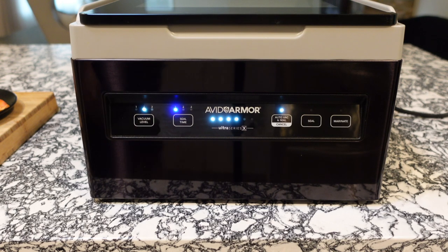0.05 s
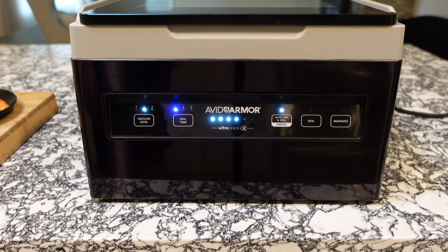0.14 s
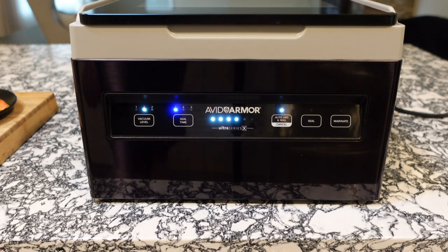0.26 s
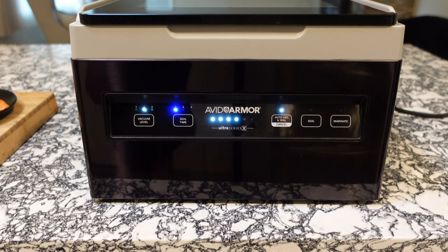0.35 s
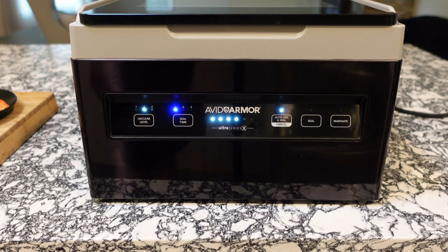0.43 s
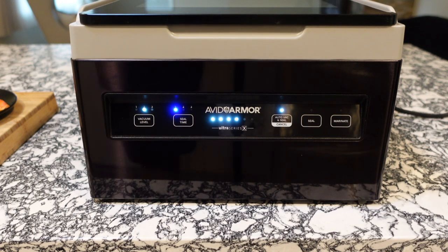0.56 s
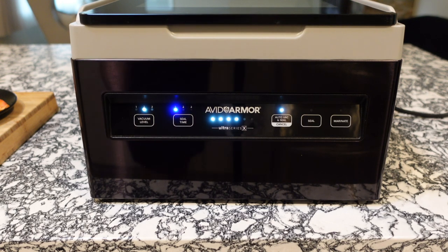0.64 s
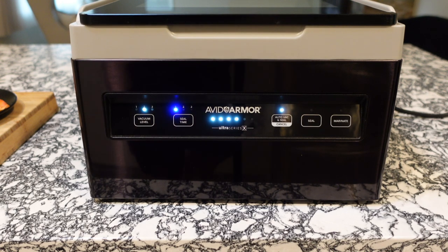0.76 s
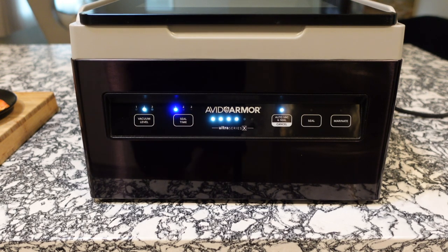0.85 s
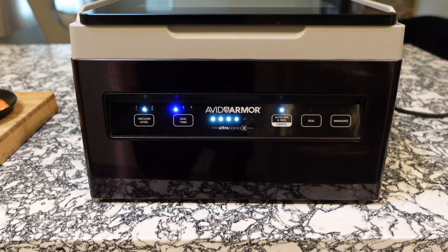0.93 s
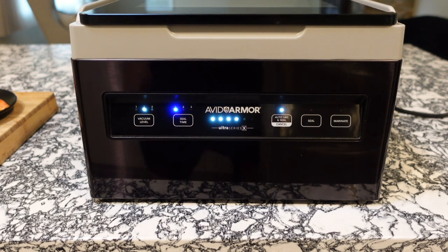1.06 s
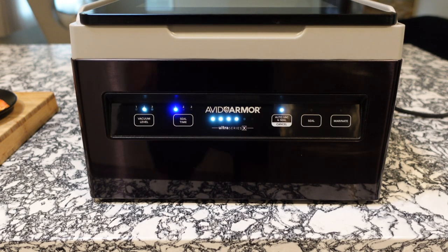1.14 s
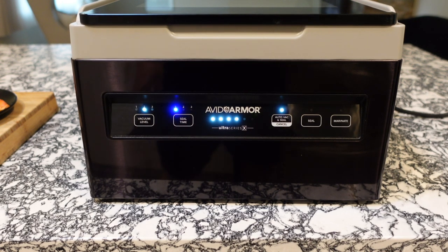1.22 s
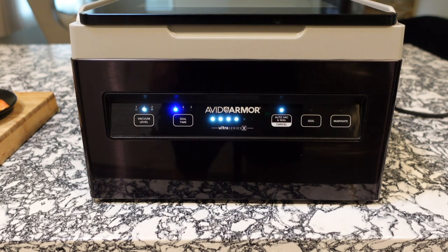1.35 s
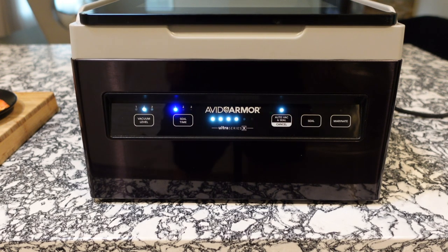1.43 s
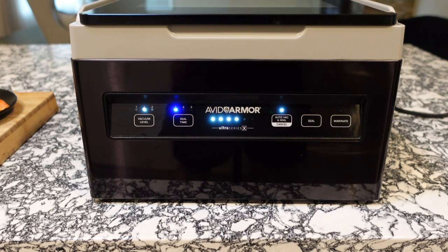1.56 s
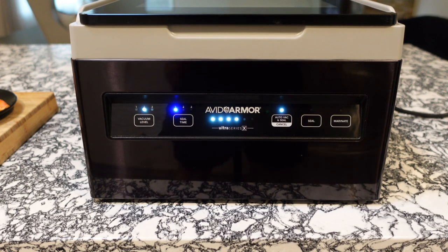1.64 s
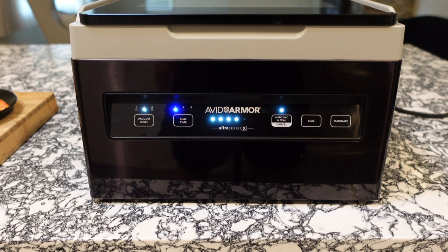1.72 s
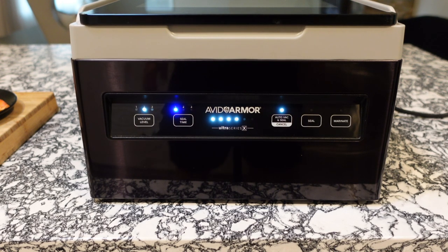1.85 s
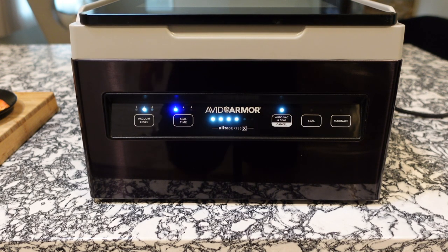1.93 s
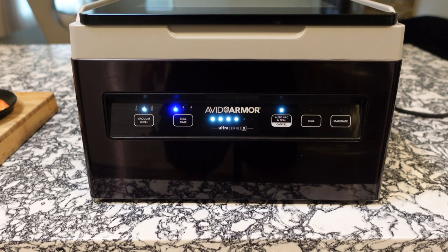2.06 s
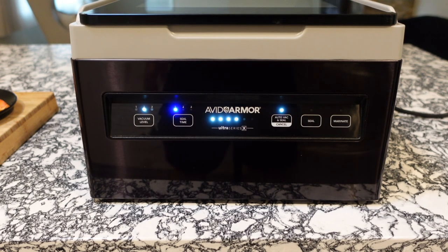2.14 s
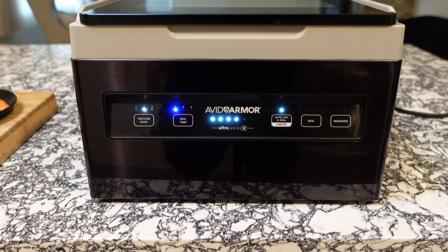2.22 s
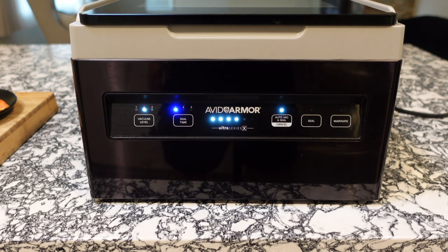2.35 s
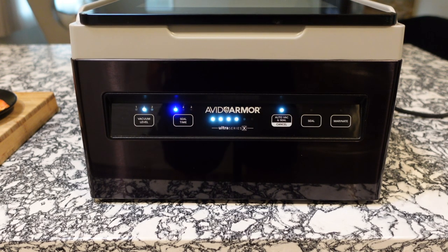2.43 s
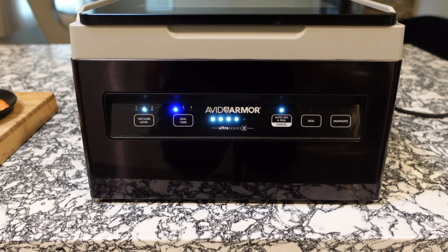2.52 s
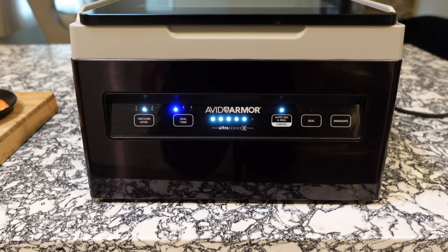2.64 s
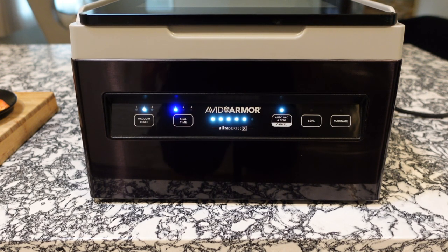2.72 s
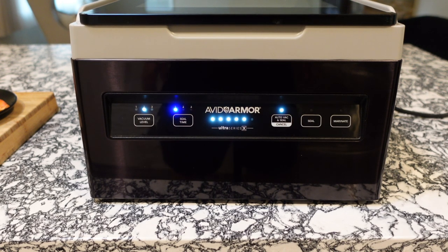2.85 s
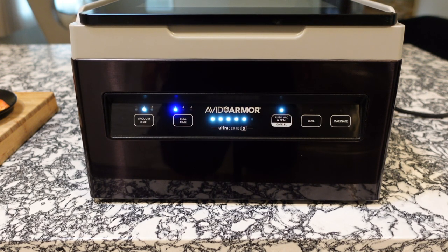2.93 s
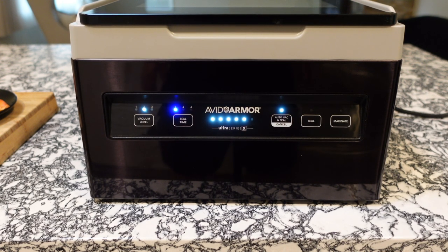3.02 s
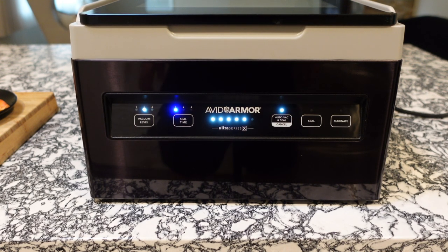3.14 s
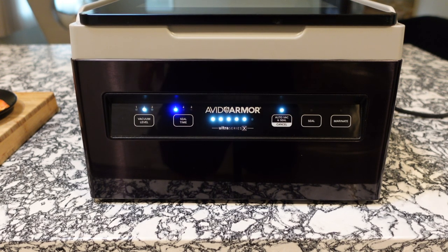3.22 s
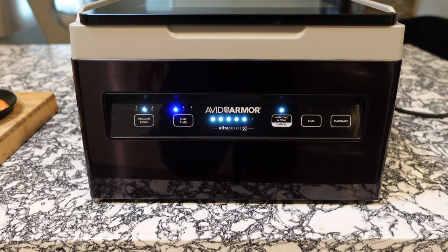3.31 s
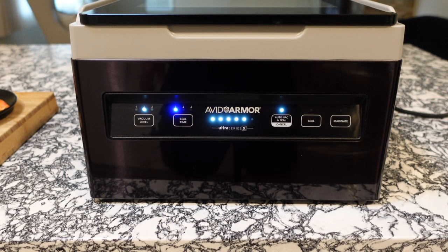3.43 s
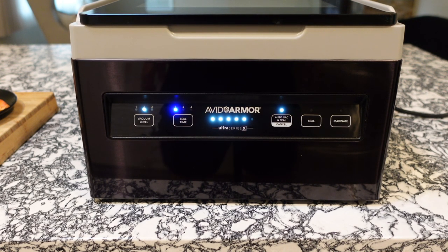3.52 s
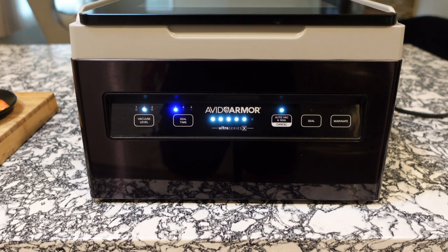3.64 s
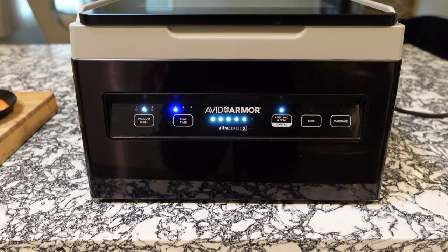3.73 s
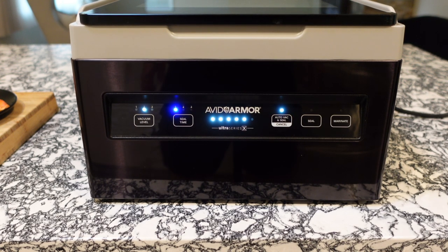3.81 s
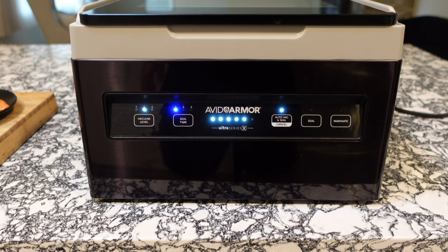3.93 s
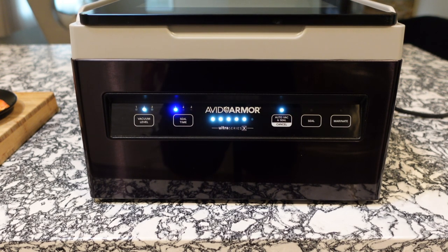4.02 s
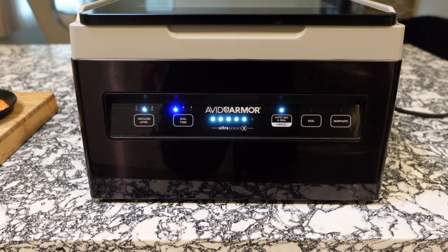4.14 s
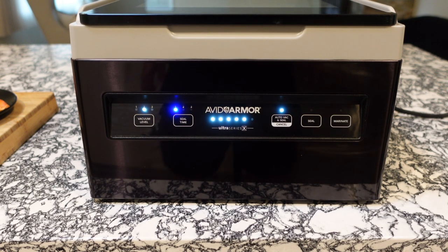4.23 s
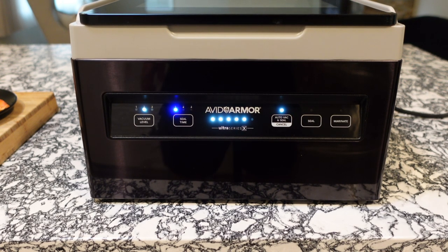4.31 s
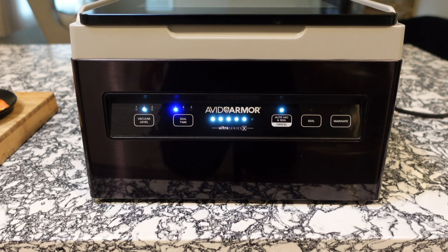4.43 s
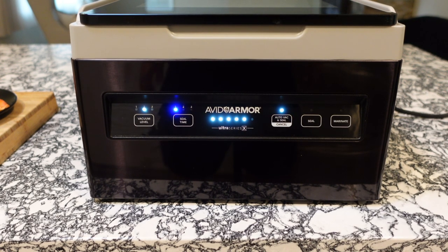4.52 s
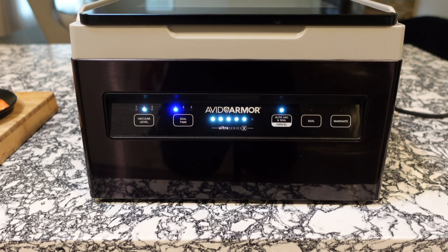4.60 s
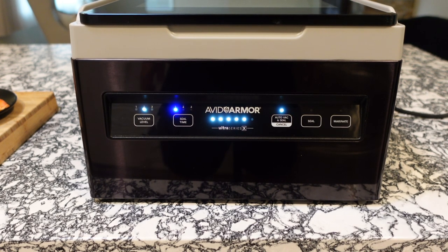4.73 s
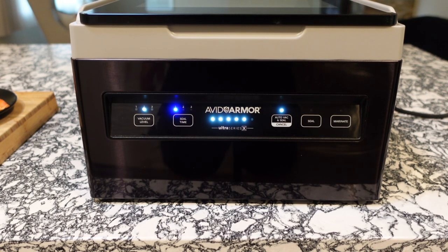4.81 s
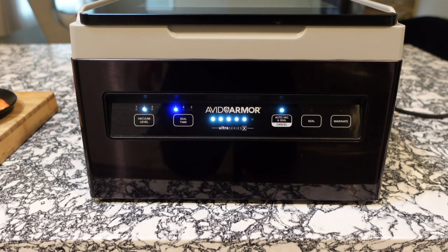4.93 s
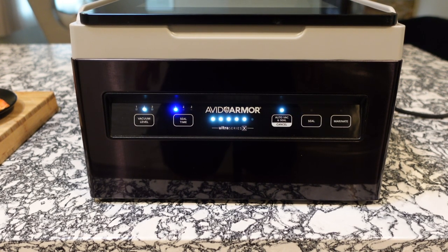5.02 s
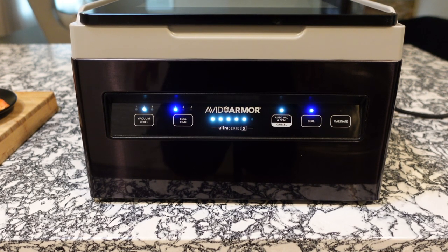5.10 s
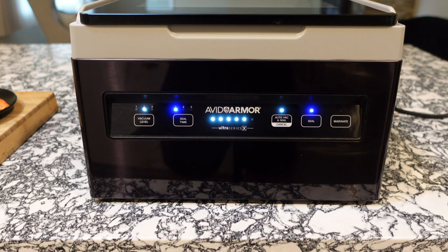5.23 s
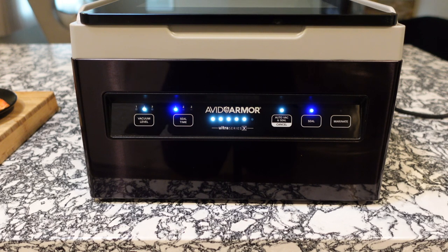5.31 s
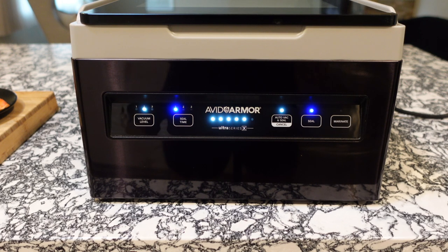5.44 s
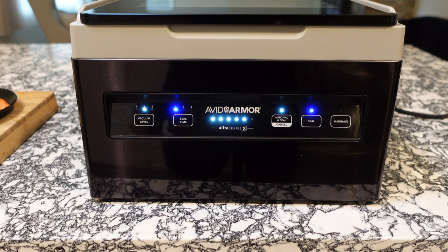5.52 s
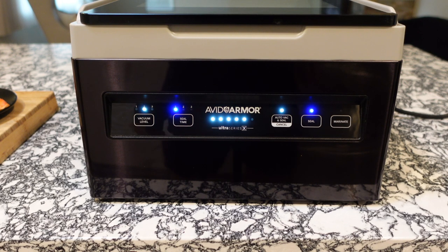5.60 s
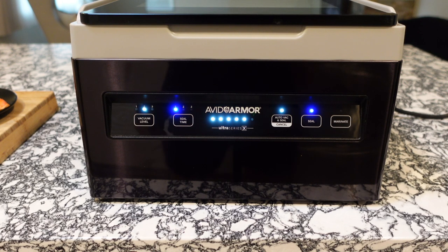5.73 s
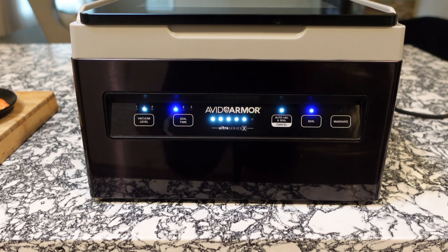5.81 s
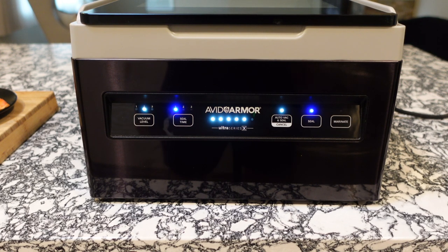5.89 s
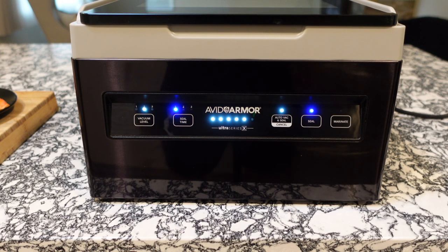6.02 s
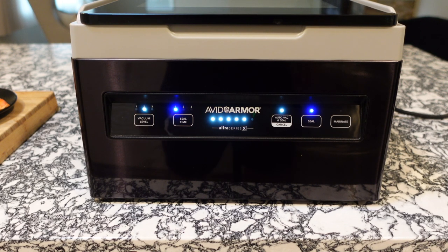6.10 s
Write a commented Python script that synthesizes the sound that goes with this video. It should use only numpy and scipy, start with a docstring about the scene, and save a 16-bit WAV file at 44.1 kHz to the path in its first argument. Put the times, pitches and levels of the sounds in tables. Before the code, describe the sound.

A vacuum sealer pump drones and clatters loudly, then a valve snaps, the pump stops and air softly hisses.

```python
"""A chamber vacuum sealer runs on a kitchen counter, its piston pump at about 35 turns a second.
The strokes drone in the cabinet, the valves clack and the exhaust puffs; early on the lid ticks once.
As the chamber empties the pump speeds up, the exhaust thins and a whistle swells and recedes.
At 4.6 s a solenoid snaps and loads the pump, which stops dead half a second later.
The fan runs on, and two puffs of air hiss into the seal bar."""
import sys
import numpy as np
from scipy import signal
from scipy.fft import rfft, irfft
from scipy.io import wavfile

SR = 44100
rng = np.random.default_rng(int(sys.argv[2]) if len(sys.argv) > 2 else 0)


def wav_record(signal):
    """Record a signal, one row per channel, as 16-bit PCM in the file named by sys.argv[1]."""
    frames = np.transpose(np.atleast_2d(signal))
    bounded = np.clip(frames, -1, 1)
    # unit amplitude maps onto the largest positive 16-bit level
    quanta = np.round(bounded * 32767).astype(np.int16)
    wavfile.write(sys.argv[1], SR, quanta)


N = 271656
TIME = np.arange(N) / SR
BINS = np.fft.rfftfreq(N, 1 / SR)
EMPTYING_S, STOP_S = 1.0, 5.155
VACUUM = 1 - np.exp(-TIME / EMPTYING_S)  # 0 = chamber full of air, 1 = empty
HUNT_DEPTH = .224  # speed wobble either way, in turns a second

# kitchen reverb: (frequency [Hz], t60 [s])
KITCHEN_DECAY = [(100, 0.055), (300, 0.95), (2000, 0.21), (6000, 0.18), (15000, 0.029)]
# fan hum: (frequency [Hz], level [dB])
FAN_HUM = [(56, -47), (105, -55.5), (199, -57), (797, -74)]
# cabinet rings stirred by the fan: (frequency [Hz], nominal width [Hz], relative level [dB])
FAN_RINGS = [(948, 63, -40), (1465, 12.5, -47.5), (1344, 36, -56)]
# the fan's draught: (frequency [Hz], relative level [dB])
FAN_AIR = [(25, -17), (40, -9), (80, -5), (130, -7), (200, 5.5), (300, 0.5), (600, -3), (1000, -8),
           (1500, -5.5), (2200, -11), (3100, -16), (4100, -21.5), (7000, -30), (12000, -33), (15500, -35)]
# air let into the seal bar: (time of full flow [s], hold [s], level [dB])
SEAL_PUFFS = [(5.437, .07, -51), (5.66, .012, -56)]
# the solenoid plunger's hit and bounces: (time [s], clunk level [dB], crack level [dB])
PLUNGER_HITS = [(4.634, -21, -19), (4.6461, -15.5, -27), (4.661, -29, -38)]
# the solenoid's ringing metal: (frequency [Hz], relative level [dB], t60 [s])
SOLENOID_RINGS = [(1580, -20, 0.35), (8050, -33.5, 0.39), (12100, -27, 0.34)]
# colours of the lid's tick and the plunger's clunk and crack: (frequency [Hz], relative level [dB])
TICK_COLOUR = [(1500, -29), (2600, 11), (3200, 7), (4200, -15), (11000, -13.5), (15000, -24)]
CLUNK_COLOUR = [(600, -24), (1100, -2), (1800, -3), (2400, -6), (3200, -11.5), (5000, -22), (9000, -35)]
CRACK_COLOUR = [(1500, -25), (3000, -4), (6000, -13), (8500, -3), (12000, 1), (16000, 3)]
# exhaust at full and thin flow, and air churning in the pump: (frequency [Hz], relative level [dB])
FULL_AIR = [(1470, -21), (2500, 4), (3150, -9), (3560, -14), (3790, -5), (4390, -11), (7080, -9),
            (8860, -12.5), (10400, -31), (14300, -29), (15800, -25)]
THIN_AIR = [(1470, -9.5), (2500, 1.5), (3150, -6), (3460, -9), (3590, -2), (3940, -6), (4460, -8.5),
            (6870, -8), (7950, -12.5), (8790, -8), (10300, -21), (14300, -13.5), (15800, -29)]
CHURN_AIR = [(40, -30), (90, -35), (180, 4.5), (300, 1), (480, -13), (900, -5.5), (1700, -5), (2600, -11.5),
             (4000, -26.5)]
# blows in one turn: (crank angle [turns], relative casing level [dB], relative valve level [dB])
BLOWS = [(0.0626, -5.1, -2.5), (0.3412, -0.3, -10.2), (0.49, -17.3, -2.2), (0.6098, -2.2, -3.5),
         (0.8062, -2.8, 1.7), (0.9395, -2.3, -13.3)]
# resonances of the reeds, casing and piston: (frequency [Hz], width [Hz], relative level [dB])
INTAKE_MODES = [(2170, 150, 0)]
OUTLET_MODES = [(2020, 120, 0)]
CASING_MODES = [(607, 19, -12), (671.3, 60, 14), (739, 310, -1), (858, 240, 2.5), (957, 210, -1),
                (928, 74, -12)]
PISTON_MODES = [(1141, 43, -1.5), (1374, 174, 0.5), (1492.5, 53, 6), (1900, 500, -11)]
# cabinet resonances that shape the drone: (frequency [Hz], width [Hz], relative level [dB])
CABINET_MODES = [(71.6, 9, -42.3), (101, 12, -40.5), (142, 15, -29.5), (179, 18, -21.2),
                 (222.9, 7.7, -11.0), (270.8, 16.6, -21.7), (314.9, 9.3, -18.5), (349.8, 4.7, -34.4),
                 (360.3, 2.7, -30.7), (396.2, 14.7, -33.7), (420.6, 6.3, -34.9), (461.9, 6.6, -30.9),
                 (485.6, 3.6, -26.5), (498.1, 18.4, -33.6), (540.3, 13.8, -36.5), (575.1, 27.8, -39.8)]


def amp(db):
    """Decibels to gain."""
    return 10 ** (np.asarray(db) / 20)


def unit(x):
    """Scales to rms 1."""
    return x / np.sqrt(np.mean(x ** 2) + 1e-20)


def curve(points, hz):
    """Reads a table along a log-frequency axis."""
    freqs, values = np.transpose(points)
    return np.interp(np.log(hz + 1), np.log(freqs + 1), values)


def noise(colour):
    """Coloured noise of rms 1."""
    return unit(irfft(rfft(rng.standard_normal(N)) * amp(curve(colour, BINS)), N))


def drift(hz):
    """A slow random wander of rms 1."""
    return unit(irfft(rfft(rng.standard_normal(N)) / (1 + (BINS / hz) ** 4), N))


def ring(x, hz, width):
    """One resonance of gain 1."""
    return signal.lfilter(*signal.iirpeak(hz, hz / width, fs=SR), x)


def pitched_noise(hz, width):
    """Noise rung twice through one resonance, at rms 1."""
    return unit(ring(ring(rng.standard_normal(N), hz, width), hz, width))


def body(x, modes, opposed=False):
    """A resonator bank with steep skirts, at rms 1; opposed neighbours swing opposite ways and merge."""
    signs = (-1) ** (np.arange(len(modes)) * opposed)
    rung = sum(sign * amp(db) * ring(x, hz, width) for sign, (hz, width, db) in zip(signs, modes))
    edges = [.88 * modes[0][0], 1.12 * modes[-1][0]]
    return unit(signal.sosfilt(signal.butter(3, edges, "band", fs=SR, output="sos"), rung))


def dying(start_s, t60):
    """Instant attack, exponential decay."""
    return (TIME >= start_s) * 10 ** (-3 * abs(TIME - start_s) / t60)


def running(t60):
    """Full level until the pump stops, then a quick release."""
    return 10 ** (-3 * np.maximum(TIME - STOP_S, 0) / t60)


def loaded(full_db, empty_db, lateness=1):
    """Gain that rides the vacuum from full chamber to empty; lateness over 1 delays the move."""
    return amp(full_db + (empty_db - full_db) * VACUUM ** lateness)


def swell(peak_s, half_width_s, db):
    """A rise and fall in dB: a reed sings loudest at one pressure on the way down."""
    return db * np.exp(-((TIME - peak_s) / half_width_s) ** 2)


def in_kitchen(x, wet_db):
    """The dry sound plus sparse reflections, each band dying at its own speed."""
    taps = np.zeros(SR)
    slots = np.arange(200, SR - 20, 20)
    taps[slots + rng.integers(0, 20, len(slots))] = rng.choice([-1., 1.], len(slots))
    hz, t, bands = signal.stft(taps, SR, nperseg=256)
    decay = amp(-60 * t / curve(KITCHEN_DECAY, hz)[:, None])
    tail = signal.istft(bands * decay, SR, nperseg=256)[1]
    return x + amp(wet_db) * signal.fftconvolve(x, tail / np.linalg.norm(tail))[:N]


def fan(air_db=-37.5, ring_trim_db=-1, waver=.0034):
    """The bed: the cooling fan hums and its draught stirs the cabinet's resonances."""
    hum = np.zeros(N)
    for hz, db in FAN_HUM:
        cycles = hz * np.cumsum(1 + waver * drift(1.7)) / SR
        hum += amp(db) * np.sqrt(2) * np.sin(2 * np.pi * cycles)
    rings = sum(amp(db) * pitched_noise(hz, 2 * width) for hz, width, db in FAN_RINGS)
    return hum + amp(ring_trim_db) * rings + amp(air_db) * noise(FAN_AIR)


def seal_bar(leak_db=-73, rise_s=.06, t60=.38):
    """Two soft puffs of air press the seal bar down; a faint leak stays."""
    flow = amp(leak_db) * (TIME > SEAL_PUFFS[0][0])
    for full_s, hold_s, db in SEAL_PUFFS:
        attack = np.clip(1 + (TIME - full_s) / rise_s, 0, 1)
        release = np.where(TIME < full_s + hold_s, 1, dying(full_s + hold_s, t60))
        flow += amp(db) * attack * release
    return flow * noise([(500, -10), (2500, 2), (6000, 4), (11000, -3), (15000, -1)])


def lid_tick(level_db=-18):
    """One small, bright tick of the lid under load."""
    tick = amp(level_db) * noise(TICK_COLOUR) * dying(start_s=.469, t60=.01)
    return in_kitchen(tick, wet_db=-8)


def solenoid(ring_trim_db=-4.5):
    """The plunger snaps over and bounces, which leaves its metal ringing."""
    snap = np.zeros(N)
    for hit_s, clunk_db, crack_db in PLUNGER_HITS:
        snap += amp(clunk_db) * noise(CLUNK_COLOUR) * dying(hit_s, t60=.078)
        snap += amp(crack_db) * noise(CRACK_COLOUR) * dying(hit_s, t60=.036)
    for hz, db, t60 in SOLENOID_RINGS:
        snap += amp(db + ring_trim_db) * dying(PLUNGER_HITS[0][0], t60) * pitched_noise(hz, hz / 7)
    return in_kitchen(snap, wet_db=-9)


def exhaust(turns, hiss_db=-42, churn_db=-35, puff_depth=.56, thinning_s=1.33):
    """Air leaves in a puff each turn; the hiss turns brighter once the flow thins."""
    thin = np.clip((TIME - thinning_s) / .044, 0, 1)
    puffs = unit(1 + puff_depth * np.exp(4 * (np.cos(2 * np.pi * (turns + .12)) - 1)))
    hiss = np.sqrt(1 - thin) * noise(FULL_AIR) + np.sqrt(thin) * noise(THIN_AIR)
    air = amp(hiss_db) * hiss + amp(churn_db) * noise(CHURN_AIR)
    return in_kitchen(air * puffs * running(t60=.31), wet_db=-8)


def crank(start_rate=34.5288, gain_per_s=.28, vacuum_gain=.1846, sag=.713, coast_per_s=4.7):
    """The pump's clock: steady speed and its hunting in turns a second, and the angle in turns."""
    solenoid_load = np.clip((TIME - 4.6979) / .1, 0, 1)  # drags just after the snap
    steady = start_rate + gain_per_s * TIME + vacuum_gain * VACUUM - sag * solenoid_load
    hunt_hz = 2 * (steady - 33.334)  # the wobble quickens as the crank runs faster
    hunt = HUNT_DEPTH * np.cos(2 * np.pi * (np.cumsum(hunt_hz) / SR + .279))
    coast = coast_per_s * np.maximum(TIME - STOP_S, 0)
    turns = np.cumsum(steady + hunt - coast) / SR - .7967
    return steady, hunt, turns


def strikes(turns, angles, levels_db, spread_db, jitter_s=.00002):
    """Clicks at set crank angles, each a little different in time and force, at rms 1."""
    each_turn = np.arange(-1, np.ceil(turns[-1]))
    clicks = np.zeros(N)
    for angle, db in zip(angles, levels_db):
        late, force = rng.standard_normal((len(each_turn), 2)).T
        hit_s = np.interp(each_turn + angle, turns, TIME) + jitter_s * late
        at = np.round(hit_s * SR).astype(int)
        inside = (at > 20) & (at < N - 20)
        clicks[at[inside]] += amp(db + spread_db * force[inside])
    return unit(clicks)


def valve_blows(turns, scrape=.36):
    """One hard clack a turn over a noisy scrape; lesser blows chatter more as the vacuum builds."""
    angles, _, levels = np.transpose(BLOWS)
    hardest = levels == levels.max()
    clack = strikes(turns, angles[hardest], levels[hardest], spread_db=1.2)
    chatter = strikes(turns, angles[~hardest], levels[~hardest], spread_db=.3)
    share = loaded(full_db=-6, empty_db=-1.5, lateness=3.8)
    return (clack + share * chatter) / np.sqrt(1 + share ** 2) + scrape * rng.standard_normal(N)


def lid_ring(turns):
    """A thump each turn rings the lid, fading as the vacuum builds."""
    thumps = strikes(turns, [.8], [0], spread_db=1)
    return loaded(full_db=-31, empty_db=-44, lateness=2.6) * body(thumps, [(963, 15, 0)])


def whistle(clacks, base_db=-52, breath=.66):
    """Clacks and breath sound the outlet's thin whistle, which swells and recedes."""
    level = amp(base_db + swell(peak_s=3.45, half_width_s=2.15, db=8.5))
    return level * body(clacks + breath * rng.standard_normal(N), [(3543, 76, 0)])


def valves(clacks, hunt):
    """Two reeds swing opposite ways; during its swell the intake surges whenever the crank slows."""
    surge = amp(swell(peak_s=1.15, half_width_s=.38, db=2.8) * (1 - hunt / HUNT_DEPTH))
    intake = loaded(full_db=-35, empty_db=-32) * body(body(clacks, INTAKE_MODES), INTAKE_MODES)
    outlet = body(body(clacks, OUTLET_MODES), OUTLET_MODES)
    outlet *= loaded(full_db=-40, empty_db=-30.5, lateness=1.3)
    return in_kitchen((surge * intake - outlet) * running(t60=.39), wet_db=-7)


def piston(turns, rebound_s=.00568, growth_db=5):
    """One sharp knock a turn rebounds twice, reversing each time, harder as the vacuum builds."""
    knock = strikes(turns, [.81], [0], spread_db=.7)
    gap = round(rebound_s * SR)
    rebounds = np.roll(knock, 2 * gap) - amp(3.5) * np.roll(knock, gap)
    return body(knock + amp(growth_db * (VACUUM - 1)) * rebounds, PISTON_MODES, opposed=True)


def clatter(turns, hunt):
    """The pump's hard edge: blows ring the casing, piston, lid and reeds, and the outlet whistles."""
    angles, casing_db, _ = np.transpose(BLOWS)
    casing = body(strikes(turns, angles, casing_db, spread_db=3.3), CASING_MODES)
    clacks = valve_blows(turns)
    lid = lid_ring(turns)
    knocks = loaded(full_db=-34, empty_db=-32, lateness=2.2) * (casing + piston(turns))
    rattle = (knocks + lid + whistle(clacks)) * running(t60=.054)
    return in_kitchen(rattle, wet_db=-14) + valves(clacks, hunt)


def cabinet(hz):
    """Gain of the cabinet's resonances at a frequency."""
    grid = np.arange(0, 700, .25)
    power = sum(amp(db) ** 2 / (1 + 2 * ((grid - centre) / width) ** 2) ** 2
                for centre, width, db in CABINET_MODES)
    return np.interp(hz, grid, np.sqrt(power))


def drone(steady, hunt, turns, waver_db=1.34, hunt_share=.49, upper_trim_db=-.55):
    """The pump's weight: one suction thump a turn, its overtones sliding through the cabinet's peaks."""
    # the thump starts smeared, tightens with the vacuum and leaves a diffuse ring at the stop
    smear = np.interp(TIME, [.5, 1.3, STOP_S, STOP_S + .031], [.0648, .017, .017, .101])
    speed = steady + hunt_share * hunt  # the resonances follow only part of the hunting
    overtones = np.zeros(N)
    for k in range(1, 17):
        level = cabinet(k * speed) * amp(waver_db * drift(3.4) + upper_trim_db * (k > 9))
        sign = -1 if 4 <= k <= 10 else 1  # outside its main resonances the cabinet swings the other way
        cycles = k * turns + smear * (k - 6.5) ** 2
        overtones += sign * level * np.sqrt(2) * np.cos(2 * np.pi * cycles)
    return overtones * running(t60=.33)


def scene():
    """The machine in mono, heard from just in front."""
    steady, hunt, turns = crank()
    pump = drone(steady, hunt, turns) + clatter(turns, hunt) + exhaust(turns)
    return (pump + lid_tick() + solenoid() + fan() + seal_bar())[None]


def record(dry):
    """A soft clip rounds the highest peaks, then a steep low-pass takes off the very top."""
    ceiling, cutoff_hz = .66, 16000
    rounded = dry / (1 + (dry / ceiling) ** 12) ** (1 / 12)
    lowpass = signal.firwin(511, cutoff_hz, window=("kaiser", 9), fs=SR)
    return signal.oaconvolve(rounded, lowpass[None], "same")


dry = scene()
out = record(dry)
wav_record(out)
```